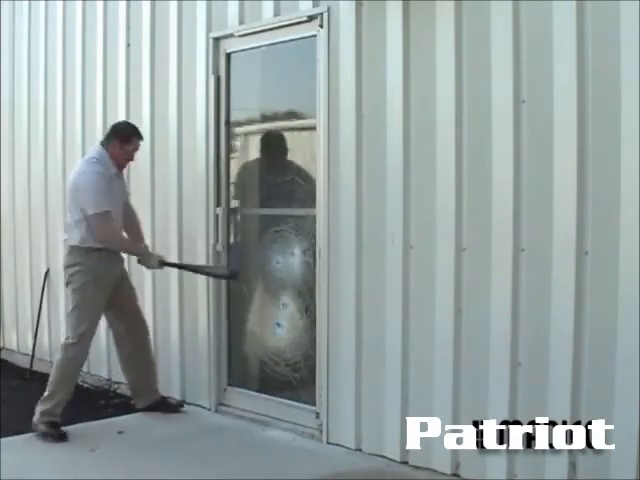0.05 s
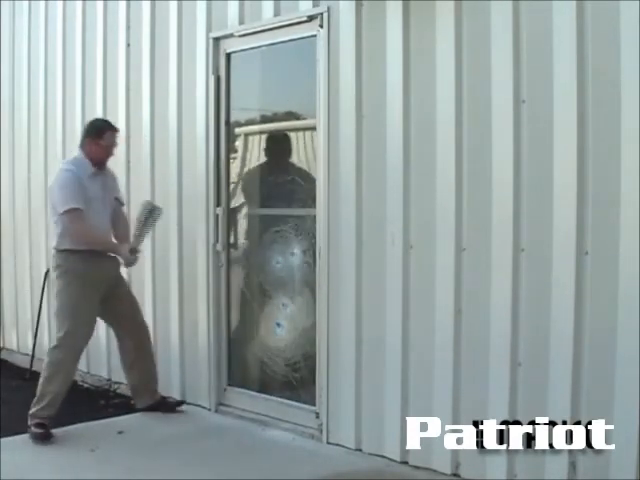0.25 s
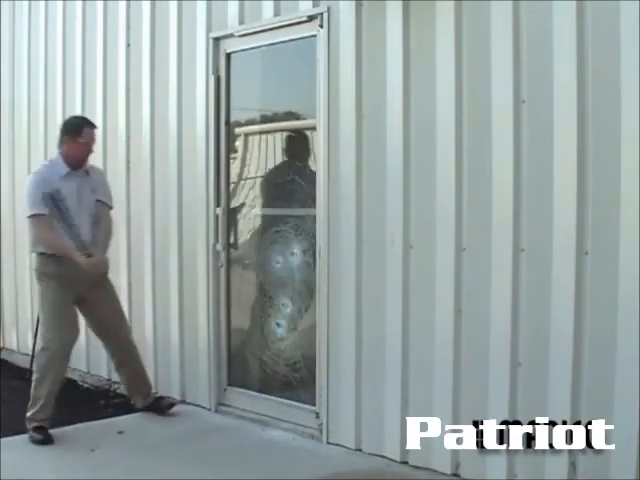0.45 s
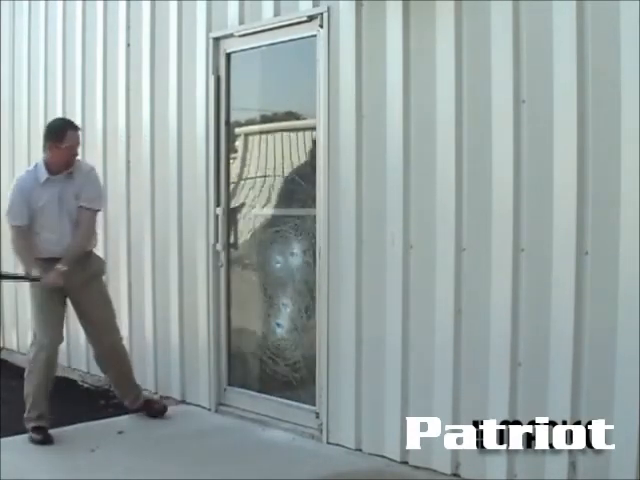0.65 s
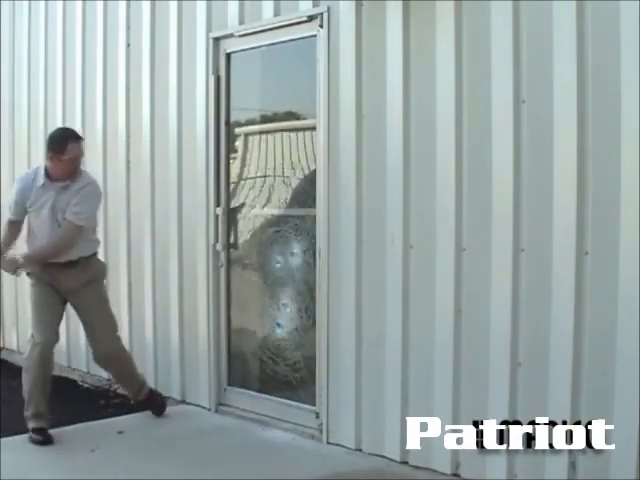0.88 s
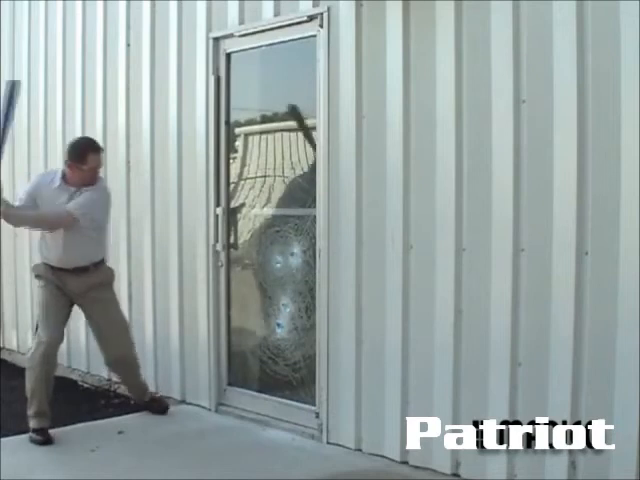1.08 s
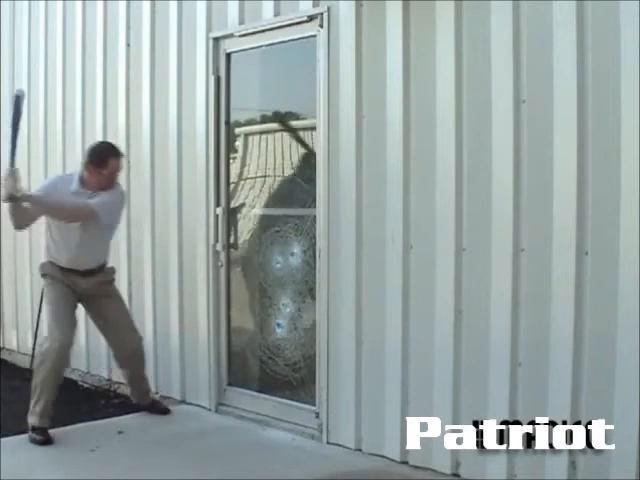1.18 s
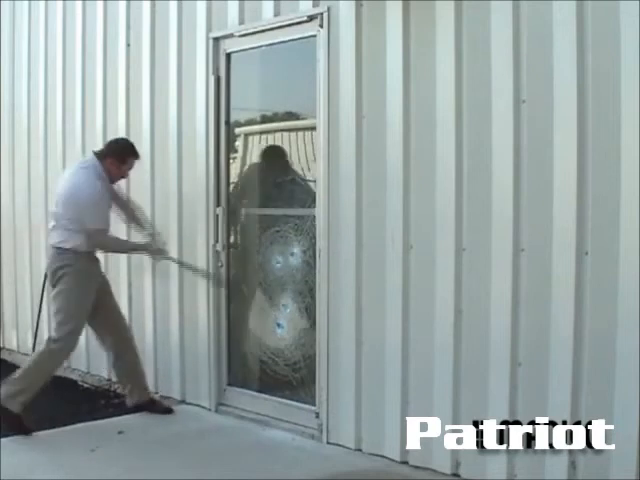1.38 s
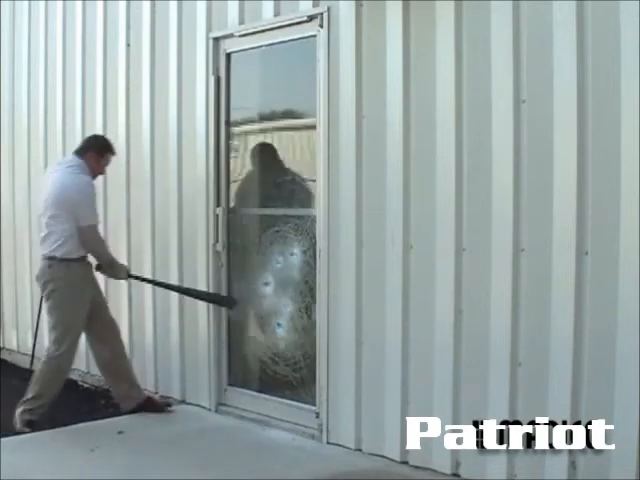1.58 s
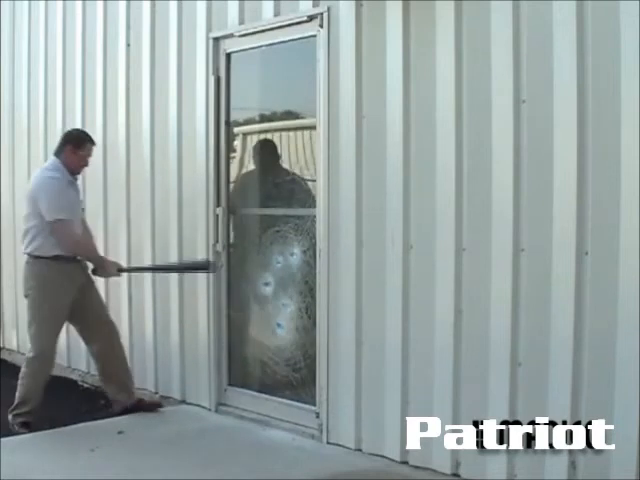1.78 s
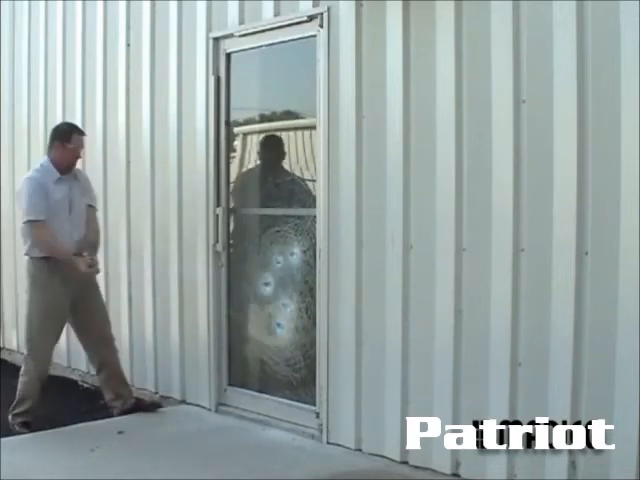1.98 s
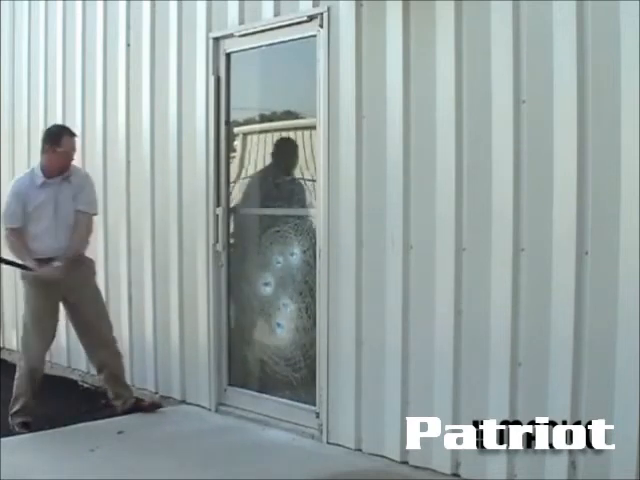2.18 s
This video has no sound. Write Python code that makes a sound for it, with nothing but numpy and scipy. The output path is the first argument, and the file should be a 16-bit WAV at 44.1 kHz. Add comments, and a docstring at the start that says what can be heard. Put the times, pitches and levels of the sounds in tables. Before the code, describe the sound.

A bar cracks against a glass door twice, each blow booming and rattling, outdoors.

```python
"""Two loud cracks, each with a boom and a rattle, then a softer knock, over distant traffic.
A bar is swung twice at a laminated glass door in a sheet-metal wall, outdoors. Each blow crushes
the glass and overloads the microphone; the pane booms and the door and wall rattle on.
After the second blow the bar knocks again. Sleeves swish, shoes scuff and splinters tick."""
import sys
import numpy as np
from scipy import signal
from scipy.fft import rfft, irfft
from scipy.io import wavfile

SR = 44100
rng = np.random.default_rng(int(sys.argv[2]) if len(sys.argv) > 2 else 0)


def store_wav(level_fs):
    """Save 16-bit WAV to argv[1]."""
    pcm = np.round(np.clip(np.atleast_2d(level_fs), -1, 1) * 32767)
    wavfile.write(sys.argv[1], SR, pcm.T.astype(np.int16))


N = 99225

# The two blows: (time [s], crack gain [dB], pane gain [dB], rattle gain [dB])
BLOWS = [(0.2103, -5, 1, 1.5), (1.7564, -4, -4, 1.5)]
# Tones of the pane in its frame: (pitch [Hz], relative level [dB], time to fade by 60 dB [s])
PANE_TONES = [(56.5, -38, 0.62), (94.6, -40.5, 1), (135.3, -32, 0.37), (210.2, -35.5, 0.58),
              (329.2, -31.5, 0.49), (399, -21.5, .06), (514.5, -23, 0.15), (577, -17, 0.035),
              (722.3, -19.5, 0.12), (1210, -36, 0.19)]
# Tone colour of the rattling door and wall: (frequency [Hz], relative level [dB])
RATTLE_COLOUR = [(21, -21), (35, -8), (98, 1.5), (150, -4), (205, -0.5), (286, -7.5), (338, -9.5),
                 (507, -6), (558, -9), (878, -12), (1520, -11), (3850, -14), (8080, -16.5), (10500, -23),
                 (13600, -54), (22000, -120)]
# The sound leans toward the wall on the right: (frequency [Hz], left minus right [dB])
WALL_LEAN = [(60, -7.5), (200, -4.5), (700, -4.5), (2400, -2.5), (8000, -1.5)]

PUSH_HZ, PUSH_DB, PUSH_FADE_S = 100, -17.5, 0.018  # the thump of the pane shoving the air
WIDTH, CRACK_WIDTH = 0.36, 0.15  # stereo widths
SIDES = np.array([[1], [-1]])  # left, right


def gain(db):
    """Turn decibels into a factor to multiply by."""
    return 10 ** (np.asarray(db) / 20)


def look_up(table, hz):
    """Read between the rows of a table, with octaves evenly spaced."""
    freqs, values = np.array(table, float).T
    return np.interp(np.log(np.maximum(hz, 1)), np.log(freqs), values)


def since(start):
    """Seconds since a moment, negative before it."""
    return np.arange(N) / SR - start


def wall_tilt(hz):
    """Left and right gains that move a sound toward the wall."""
    return gain(SIDES * look_up(WALL_LEAN, hz) / 2)


def noise(colour, width=WIDTH, lean=True):
    """Stereo noise of a given tone colour, scaled to a level of one."""
    # Stereo spread: (frequency [Hz], width factor)
    spread = [(60, 0.82), (500, 0.88), (4000, 1.17), (9000, 1.54), (11000, 0.24)]
    hz = np.fft.rfftfreq(N, 1 / SR)
    low, high = colour[0][0], colour[-1][0]
    roll_off = np.minimum(hz / low, 1) ** 2 * np.exp(-10 * np.maximum(hz / high - 1, 0))
    mid, side = rfft(rng.standard_normal((2, N))) * gain(look_up(colour, hz)) * roll_off
    stereo = mid + width * look_up(spread, hz) * side * SIDES
    out = irfft(stereo * (wall_tilt(hz) if lean else 1), N)
    return out / out.mean(0).std()


def wander(turns_per_s):
    """A line that drifts between random values, mostly within -1 to 1."""
    points = rng.standard_normal(2000)
    return np.interp(since(0) * turns_per_s, np.arange(len(points)), points)


def burst(start, fade_s, hold_s=0):
    """A level that jumps up, holds, then falls by 60 dB every fade_s."""
    t = since(start)
    return (t >= 0) * gain(-60 * np.maximum(t - hold_s, 0) / fade_s)


def ring(start, tones, lean=True):
    """The pure tones of a struck object, each fading at its own speed."""
    out = 0
    for hz, db, fade_s in tones:
        tone = gain(db) * burst(start, fade_s) * np.sin(2 * np.pi * hz * since(start))
        out = out + tone * (wall_tilt(hz) if lean else 1)
    return out


def grains(per_s=150, grain_s=0.00076):
    """Broken edges grind together: a steady level with tiny spikes of uneven size."""
    chance, size = rng.random(N), rng.standard_normal(N)
    hits = (chance < per_s / SR) * gain(-14.5 + 9 * np.clip(size, -2, 2))
    level = 0.5 + signal.lfilter([1], [1, -np.exp(-1 / (grain_s * SR))], hits)
    return level / np.sqrt(np.mean(level ** 2))


def outdoors():
    """Distant traffic rumbles, and a thin hiss comes and goes."""
    # Colours of the traffic and the hiss: (frequency [Hz], relative level [dB])
    traffic_colour = [(15, -59), (25, -19), (103, 1), (183, -3), (217, -1.5), (308, -10), (366, -5.5),
                      (532, -5), (919, -6), (1750, -13), (2030, -16.5), (2190, -16), (9500, -38),
                      (12400, -64), (20900, -120)]
    hiss_colour = [(1000, 2), (2500, -2), (5000, -5.5), (8800, -1.5), (10000, -15)]
    # Rise and fall of the hiss: (time [s], level [dB])
    hiss_levels = [(0, -54.5), (0.752, -48), (1.0, -56), (1.25, -60), (1.5, -58), (1.6, -50.5),
                   (2.0, -47.5), (2.25, -45.5)]
    flicker = gain(1.2 * wander(60))
    hiss = gain(np.interp(since(0), *np.array(hiss_levels).T)) * flicker
    traffic = gain(-45 + 0.5 * wander(9.85)) * noise(traffic_colour)
    return traffic + hiss * noise(hiss_colour)


def feet():
    """Shoes come down and scuff on gritty concrete."""
    # Footfalls: (time [s], level [dB])
    footfalls = [(0.529, -36.5), (0.646, -36), (0.765, -45.5), (2.191, -36)]
    # Scuffs of shoes and cloth: (time [s], level [dB], half length [s])
    scrapes = [(0.672, -34.5, 0.0045), (2.217, -37, 0.00415)]
    # Colours of a step and a scuff: (frequency [Hz], relative level [dB])
    step_colour = [(40, -25), (100, 6), (220, 5), (330, -18.5), (480, 13.5), (700, -55), (1000, -18),
                   (5000, -35)]
    scuff_colour = [(100, -16), (450, 7.5), (1200, -5), (1750, -12), (2200, 5.5), (2750, -3), (3500, 3.5),
                    (4300, -2), (5300, 3.5), (6800, -19.5), (9000, -33.5), (10500, -53)]
    steps = sum(gain(db) * burst(s, fade_s=0.098) for s, db in footfalls)
    scuffs = sum(gain(db) / np.hypot(1, (since(s) / half) ** 2) for s, db, half in scrapes)
    grit = gain(2 * wander(600))
    return noise(step_colour) * steps + noise(scuff_colour) * scuffs * grit


def splinters():
    """Splinters give small gritty ticks as the cracked pane settles."""
    # Ticks: (time [s], level [dB], fade time [s])
    ticks = [(0.6678, -36, 0.031), (0.764, -45, .05), (0.806, -42, 0.051), (0.845, -40.5, 0.018),
             (0.88, -44.5, 0.036), (0.948, -47, 0.044), (0.984, -45.5, 0.082), (2.15, -35.5, 0.037),
             (2.2147, -34.5, 0.018)]
    # Colour of a tick: (frequency [Hz], relative level [dB])
    tick_colour = [(1000, -30), (3000, -14), (6000, -6.5), (8300, 0), (9800, -12), (10800, -3)]
    level = sum(gain(db) * burst(s, fade_s) for s, db, fade_s in ticks)
    return noise(tick_colour) * gain(0.97 * wander(500)) * level


def swings(swell_db_per_s=314):
    """Sleeves and bar swish through the air; a hiss swells up to each blow."""
    # Swings: (time of the middle [s], level [dB], half length [s])
    strokes = [(0.093, -44.5, 0.023), (1.632, -35, .033)]
    # Colours of the swish and the swell: (frequency [Hz], relative level [dB])
    swish_colour = [(350, -16), (600, -2), (1440, -6.5), (1760, -18), (1990, -10), (2920, -1), (4500, -7),
                    (8550, 2), (11500, -9), (15000, -39), (22000, -120)]
    swell_colour = [(60, 1), (300, -6.5), (1500, -7.5), (5000, -9), (8500, -8), (11000, -10),
                    (15000, -16.5)]
    swish = sum(gain(db) / np.hypot(1, (since(s) / half) ** 2) for s, db, half in strokes)
    swell = sum((since(s) < 0) * gain(-23.5 - swell_db_per_s * abs(since(s))) for s, *_ in BLOWS)
    sleeves = noise(swish_colour) * swish * gain(1.4 * wander(150))
    return sleeves + noise(swell_colour, lean=False) * swell


def knocks(hollow_hz=1275):
    """The bar lands again more softly: a hollow knock, a shove of the pane and a short rattle."""
    # Later touches of the bar: (time [s], gain [dB])
    touches = [(1.935, -0.5), (1.9569, -20.5), (1.98, -24.5)]
    # Colour of a knock: (frequency [Hz], relative level [dB])
    knock_colour = [(59, -39), (100, -14), (484, 0.5), (1330, -2.5), (1560, -20), (1860, -41), (2490, -2),
                    (4460, -17), (5310, -25), (6330, -10), (7110, -27), (7690, -4.5), (10500, -31),
                    (13600, -60), (22000, -120)]
    contact = gain(-11.5) * noise(knock_colour, CRACK_WIDTH, lean=False)
    chatter = gain(-22.5) * noise(RATTLE_COLOUR) * gain(2.8 * wander(200))
    out = 0
    for s, db in touches:
        tap = contact * burst(s, fade_s=0.017, hold_s=0.0029)
        hollow = ring(s, [(hollow_hz, -9.5, 0.029)], lean=False)
        push = ring(s, [(PUSH_HZ, PUSH_DB - 1, PUSH_FADE_S)], lean=False)
        boom = gain(-1.5) * ring(s, PANE_TONES)
        out = out + gain(db) * (tap + hollow + push + boom + chatter * burst(s, fade_s=0.23))
    return out


def rattle(hold_s=0.095, sag_db_per_s=38, rise_cycles=3.5):
    """Cracked glass crunches and the wall panels chatter, then die away, the highest sounds first."""
    # How long the rattle lasts: (frequency [Hz], fade time [s])
    fade_times = [(60, 1.0), (200, 0.98), (700, 0.7), (2500, 0.87), (8000, 0.65), (13000, 0.56)]
    hz = np.fft.rfftfreq(N, 1 / SR)
    chatter, crunch = rfft(noise(RATTLE_COLOUR)), grains()
    octaves_hz = 50 * 2. ** np.arange(9)
    out = 0
    for centre, share in zip(octaves_hz, np.eye(len(octaves_hz))):
        one_octave = look_up(list(zip(octaves_hz, share)), hz)
        band = irfft(chatter * one_octave, N) * (crunch if centre > 600 else 1)
        for s, _, _, db in BLOWS:
            t = np.maximum(since(s), 0)
            # A panel needs a few cycles to get going, so the low sounds come late.
            rise = 1 - np.exp(-t * centre / rise_cycles)
            sag = gain(db - sag_db_per_s * np.minimum(t, hold_s))
            out = out + band * rise * sag * burst(s, look_up(fade_times, centre), hold_s)
    return gain(-22) * out


def glass_spray():
    """Glass splinters finely right after each blow."""
    # Colour of the splintering: (frequency [Hz], relative level [dB])
    spray_colour = [(600, -10), (1500, -3), (3000, -26), (5000, -8), (8500, -3), (10500, -1), (15000, -5)]
    level = sum(gain(db - 13.5) * burst(s, fade_s=0.14) for s, db, _, _ in BLOWS)
    return noise(spray_colour) * grains() * level


def pane_booms(sway_hz=59, sway_delay_s=0.116, sway_s=0.037):
    """The struck pane shoves the air and booms; the whole door sways a moment later."""
    out = 0
    for s, _, db, _ in BLOWS:
        push = ring(s, [(PUSH_HZ, PUSH_DB, PUSH_FADE_S)], lean=False)
        t = since(s + sway_delay_s)
        sway = gain(-31) * np.exp(-(t / sway_s) ** 2) * np.sin(2 * np.pi * sway_hz * t)
        out = out + gain(db) * (push + ring(s, PANE_TONES) + sway * wall_tilt(sway_hz))
    return out


def cracks():
    """The bar crushes the glass for a few milliseconds and rings."""
    # Colour of glass being crushed: (frequency [Hz], relative level [dB])
    crack_colour = [(60, -9), (130, 5.5), (280, 5.5), (420, -4.5), (750, 1), (1050, -4.5), (1600, -7),
                    (2200, -1.5), (3000, -1.5), (4000, -6), (5400, -1), (6600, -6), (7500, 0), (8700, -3),
                    (10500, -19.5), (15000, -19)]
    # Tones of the bar: (pitch [Hz], relative level [dB], fade time [s])
    bar_tones = [(1565, -38, 0.027), (2234, -23.5, 0.12), (5540, -26, 0.045), (7250, -21, 0.031),
                 (7310, -8, 0.036), (8240, -24, 0.026)]
    crush = gain(-2) * noise(crack_colour, CRACK_WIDTH, lean=False)
    out = 0
    for s, db, _, _ in BLOWS:
        crack = crush * burst(s, fade_s=0.015, hold_s=0.0044)
        out = out + gain(db) * (crack + ring(s, bar_tones, lean=False))
    return out


def scene(edge_hz=9880):
    """Add all the sounds; only the blows, their spray and the swings keep their highest treble."""
    treble_cut = signal.cheby1(8, 0.3, edge_hz, fs=SR, output="sos")
    duller = signal.sosfilt(treble_cut, rattle() + knocks() + feet() + splinters() + outdoors())
    return duller + cracks() + pane_booms() + glass_spray() + swings()


def record(dry, ceiling=0.66, top_hz=15900):
    """The cracks overload the microphone: their peaks are flattened, then the top treble is cut."""
    treble_cut = signal.ellip(8, 0.2, 80, top_hz, fs=SR, output="sos")
    return signal.sosfilt(treble_cut, np.clip(dry, -ceiling, ceiling))


dry = scene()
out = record(dry)
store_wav(out)
```